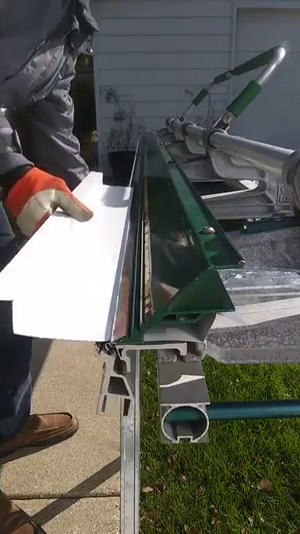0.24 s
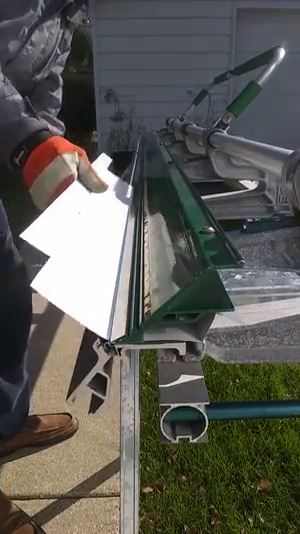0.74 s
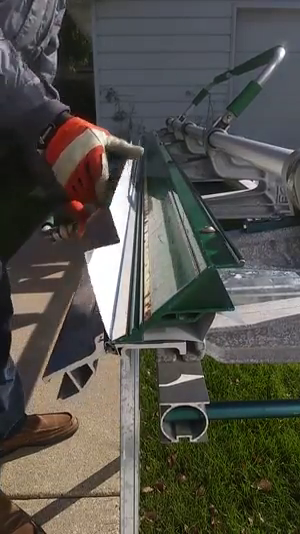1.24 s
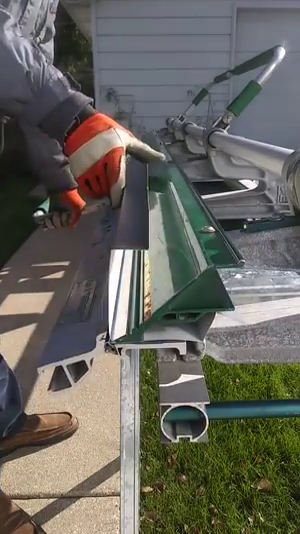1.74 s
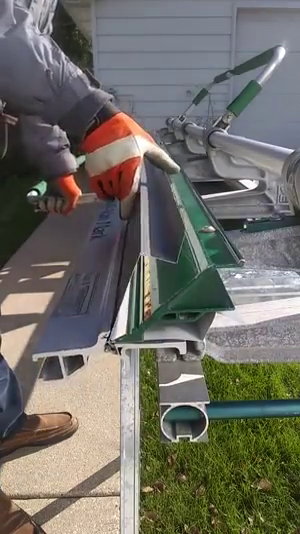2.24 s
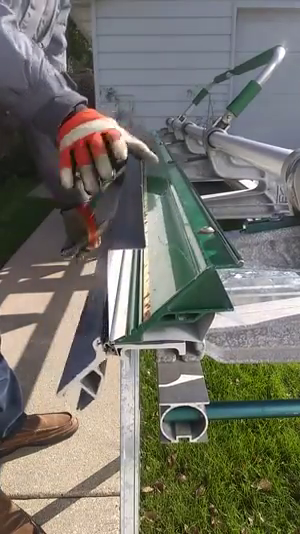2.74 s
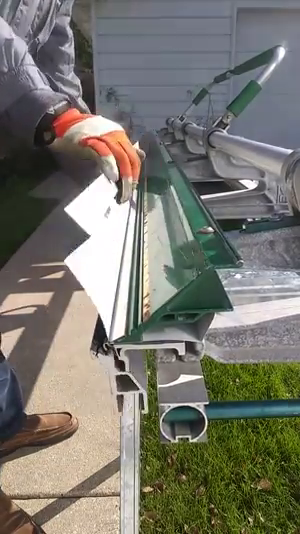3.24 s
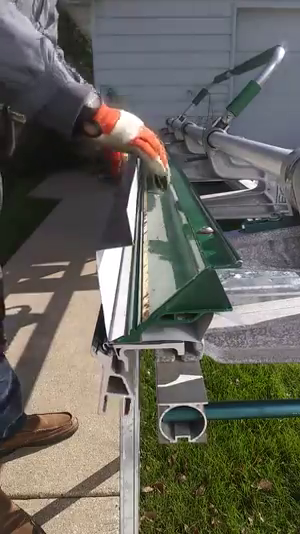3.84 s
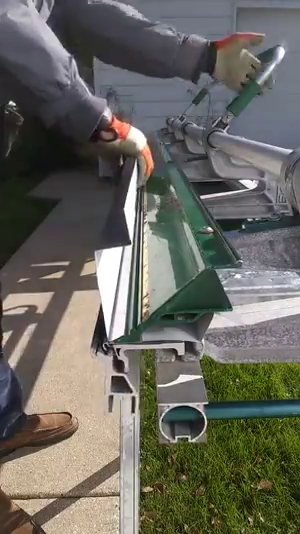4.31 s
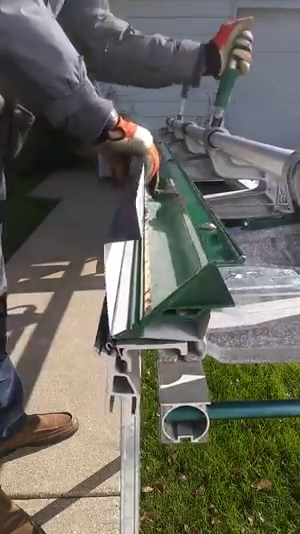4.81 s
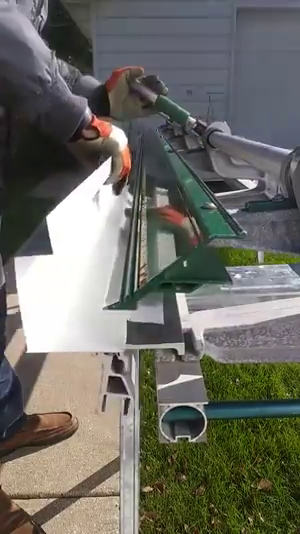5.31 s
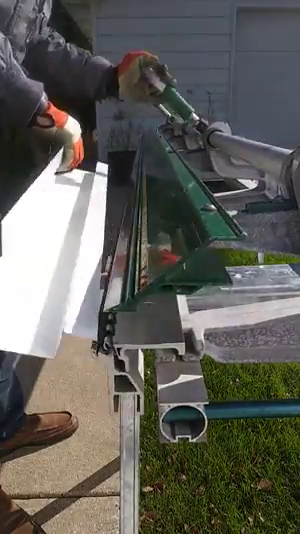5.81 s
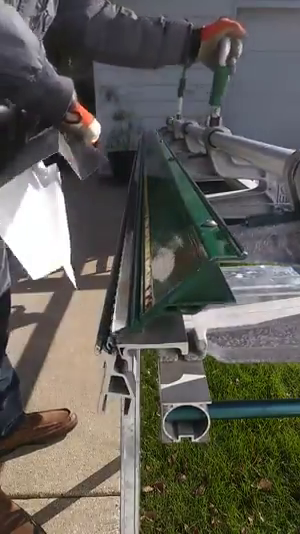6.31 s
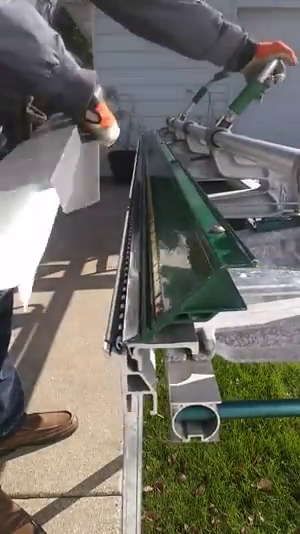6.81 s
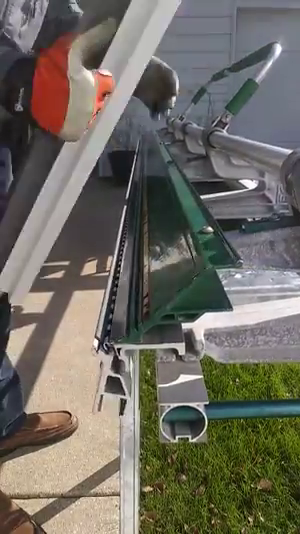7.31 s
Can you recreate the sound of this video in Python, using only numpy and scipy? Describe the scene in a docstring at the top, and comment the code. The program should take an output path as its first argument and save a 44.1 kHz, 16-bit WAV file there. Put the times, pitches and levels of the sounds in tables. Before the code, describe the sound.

Outdoors, a thin aluminum sheet scrapes and flexes in a hand bending brake while the hinge gives high squeals and wind briefly buffets the microphone. The sheet rubs and wobbles in bursts, with a few sharp, hollow knocks. Then the clamp lever judders open in a quick metallic rattle, the sheet snaps free loudly and slides out with light taps, leaving a faint steady hiss.

```python
"""A thin aluminium sheet scrapes, flexes and is knocked flat as it is folded on a hand brake outdoors.
Sliding friction and impacts excite its modes of vibration. The hinge squeals by stick-slip oscillation
as the bending leaf swings up. The clamp lever judders open, and the sheet snaps free and is pulled out.
The yard reverberates faintly behind a steady hiss, and a light wind buffets the microphone."""
import sys
import numpy as np
from scipy import signal
from scipy.fft import rfft, irfft, next_fast_len
from scipy.io import wavfile
from scipy.ndimage import uniform_filter1d, minimum_filter1d, map_coordinates

SR = 44100
rng = np.random.default_rng(int(sys.argv[2]) if len(sys.argv) > 2 else 0)


def store_wav(level_fs):
    """Save 16-bit WAV to argv[1]."""
    pcm = np.round(np.clip(np.atleast_2d(level_fs), -1, 1) * 32767)
    wavfile.write(sys.argv[1], SR, pcm.T.astype(np.int16))


N = 333286

# Levels in the tables are relative; each source applies its own gain.
# Strokes of the sheet on the brake: start_s, rise_s, hold_s, rub_db, flex_db, edge_db
SHEET_STROKES = [ (0.257, 0.019, 0.018, -36.5, -26.5, -67), (0.60, 0.042, .02, -39.5, -44, -53),
                 (0.664, 0.027, .11, -26, -37.5, -23), (0.848, 0.025, 0.01, -29.5, -44, -27.5),
                 (0.898, 0.042, .04, -32, -27.5, -46), (1.043, 0.031, 0.092, -33, -42, -26.5),
                 (1.104, 0.038, .28, -22.5, -28.5, -41), (1.409, .12, 0.078, -27.5, -26.5, -44.5),
                 (1.952, .06, .04, -44, -32.5, -65), (2.05, 0.034, 0.037, -26.5, -29.5, -48),
                 (2.11, 0.034, 0.022, -24.5, -27, -52), (2.17, 0.035, 0.093, -48, -29, -65),
                 (2.675, .034, .064, -16.5, -13.5, -25.5), (2.794, 0.054, 0.046, -27.5, -26.5, -40.5),
                 (2.865, 0.04, 0.011, -23, -28.5, -30.5), (3.05, 0.044, 0.1, -43.5, -36.5, -47),
                 (3.249, 0.025, 0.016, -18.5, -18, -31), (4.529, 0.029, .085, -37, -38, -45),
                 (4.761, 0.035, 0.035, -43.5, -43, -44.5), (4.871, 0.047, .012, -28.5, -27.5, -34.5),
                 (4.948, 0.036, 0.051, -34.5, -32.5, -33.5), (5.264, 0.027, 0.026, -33, -30, -38.5),
                 (5.425, .018, .03, -27, -29, -43), (5.495, 0.029, 0.28, -33, -27.5, -44.5)]
# Decay rates after a stroke: rub_db_per_s, flex_db_per_s, edge_db_per_s
STROKE_RELEASES = [212, 185, 309]
# Hand presses on the panel: start_s, hold_s, level_db
PANEL_PRESSES = [(2.535, 0.085, -30), (2.715, 0.091, -33), (2.88, 0.097, -27), (3.263, .02, -26),
                 (3.33, .01, -27), (3.405, .008, -25), (4.565, 0.046, -30)]
# Impacts: start_s, level_db, brightness_db
SHEET_KNOCKS = [(0.263, -27, -10), (2.353, -25, -1), (2.542, -2, -1.5), (3.279, -17, 0.5), (3.29, -3, -1),
                (4.558, -8.5, -1.5)]
CLAMP_JOLTS = [(3.526, -26, 10), (3.553, -29.5, 7), (4.911, -17.5, 3), (5.047, -11.5, 0), (5.068, -13, 2),
               (5.106, -6, -0.5), (5.130, -11.5, 1), (5.164, -5, -5), (5.177, -11.5, 1), (5.211, -3.5, -4),
               (5.236, -5, -7.5), (5.276, -12.5, -2), (5.290, -8.5, -8)]
SHEET_SNAP = [(5.467, 2, 10)]
CORNER_TAPS = [(5.6685, -28.5, 3), (5.697, -24.5, 9), (5.7358, -14, 4), (6.7403, -33, -17)]
# Stick-slip squeals: start_s, hold_s, pitch_hz, level_db
HINGE_LOW_SQUEALS = [(0.663, 0.096, 1555, -14), (0.780, 0.073, 1564, -10), (0.874, 0.012, 1516, -19.5),
                     (0.926, .008, 1522, -23.5)]
HINGE_HIGH_SQUEALS = [(0.644, .002, 2345, -29), (0.666, 0.027, 2407, -15), (0.721, 0.058, 2436, -16),
                      (0.865, 0.062, 2575, -26)]
LEAF_SQUEAL = [(1.043, 0.07, 1230, -17.5)]
LEAF_CHIRP = [(2.498, .022, 960, -30)]
CLAMP_SQUEAL = [(5.044, 0.032, 940, -21.5)]
# Harmonic series of the squeals: harmonic_number, level_db
HINGE_HARMONICS = [(1, -1), (2, -14), (3, -18.5), (4, -24.5), (5, -38), (6, -52)]
SQUEAK_HARMONICS = [(1, 1), (2, -11.5), (3, -28.5), (4, -40)]
LEAF_HARMONICS = [(1, -1.5), (2, -3), (3, -14.5), (4, -9.5), (5, -33), (6, -35)]
JUDDER_HARMONICS = [(4, -16), (6, -2.5), (7, -12), (9, -7), (11, -8.5), (14, -11), (22, -21)]
CHIRP_HARMONICS = [(1, -0.5), (2, -8.5), (3, -18), (4, -18), (5, -29)]
# Normal modes of the metal: frequency_hz, level_db, t60_s
SHEET_RESONANCES = [(284, -18, 0.42), (383.7, -9.5, 0.12), (548, 0.5, 0.092), (650, -5.5, 0.25),
                    (786, 2, 0.11), (1186, -13, 0.25), (1570, 3, 0.022), (1327, -3.5, 0.11),
                    (1970, -12.5, 0.16), (2560, -6.5, 0.13)]
EDGE_RESONANCES = [(3383, 0.5, 0.22), (5370, -3, 0.14), (7680, -17, 0.18), (10200, -33, .15)]
PANEL_RESONANCES = [(292, -8, 0.2), (379, -4.5, 0.16), (548, 6.5, 0.17), (640, -6.5, 0.12),
                    (798, -9.5, 0.11)]
CLAMP_RESONANCES = [(752, -2.5, 0.076), (960, -21, 0.046), (1499, -2, 0.09), (1593, 5.5, 0.044),
                    (1760, -23, .12), (2270, -11, 0.14), (2360, -3, 0.056), (2750, -7, 0.11),
                    (5660, -13, .12), (5990, -17, 0.11), (6800, -27, .15)]
SNAP_RESONANCES = [(745, -5, .2), (993, -8, .2), (1470, 1, 0.17), (1635, -2, 0.12), (2420, -4, .11),
                   (2714, -0.5, .09), (5570, -12.5, .1), (6650, -16, 0.12)]
CORNER_RESONANCES = [(1580, -2, .08), (2230, 1, .08), (5600, 0, .05), (5790, 0, .05), (6110, -1, .05),
                     (6650, -8, .05)]
# Spectral envelopes of friction, impacts and air: frequency_hz, level_db
RUB_SPECTRUM = [(300, -26.5), (700, -3.5), (1100, 0), (1900, 4), (2700, -4), (3600, -11.5), (4300, -20.5),
                (6000, -20.5), (9000, -65)]
FLEX_SPECTRUM = [(70, -66), (280, -13.5), (390, -1), (620, 0), (850, 0), (1200, -9), (2500, -62)]
EDGE_SPECTRUM = [(2000, -25), (3400, 11), (4400, -2), (5400, 2.5), (6300, 0), (7000, -17), (9000, -20.5),
                 (11500, -33.5), (15500, -30)]
KNOCK_SPECTRUM = [(60, -65), (280, -25), (550, 6.5), (1000, 5.5), (1900, 1.5), (3500, -3), (4300, -14),
                  (6000, -8), (7200, -27), (11000, -45), (15500, -54)]
CLAMP_SPECTRUM = [(50, -41), (250, -2.5), (700, -5), (1200, 0.5), (1650, 8), (2700, 3), (3400, -6),
                  (4800, -9.5), (6300, -8.5), (7500, -21.5), (11000, -34.5), (15500, -49)]
BUFFET_SPECTRUM = [(18, -62), (30, -41.5), (63, -8.5), (146, -3), (215, -1.5), (313, -8.5), (473, -14.5),
                   (600, -25.5), (780, -47), (1320, -120)]
AIR_SPECTRUM = [(22, -43), (49, -13.5), (113, -0.5), (280, -3.5), (370, -6.5), (527, -4), (750, -8.5),
                (1900, -8.5), (3750, -11.5), (4300, -17), (6250, -18), (7300, -35), (11000, -47),
                (15800, -50.5)]
# Decay times of the sheet's dense modes and of the yard: frequency_hz, t60_s
PLATE_DECAY = [(300, 0.24), (1500, 0.14), (6000, 0.094), (14000, 0.018)]
YARD_DECAY = [(200, 0.82), (2000, 0.35), (6000, 0.38), (14000, 0.19)]
# Gusts on the microphone: start_s, hold_s, level_db
WIND_GUSTS = [(0.61, 0.033, -29.5), (0.71, 0.4, -19), (1.03, 0.011, -22), (1.18, .025, -27.5),
              (1.59, 0.09, -35.5), (7.15, 0.11, -36.5)]
# Strength of the breeze: time_s, level_db
BREEZE_LEVELS = [(0, -45), (1.5, -41), (2.1, -50), (4.9, -48), (5.6, -41), (6.12, -38.5), (7.56, -39.5)]

SAG_DB_PER_S = 31  # every push weakens while it lasts
SQUEAL_RELEASE_DB_PER_S = 404
TOP_HZ = 15850


def sheet_scraping(catch_db=2.5, grit_db=3.5):
    """Frictional excitation: each stroke rubs the face, flexes the panel and drags the sharp edge."""
    slips = amp(catch_db * wobble(130) + grit_db * wobble(1500))
    rub_gain, flex_gain, edge_gain = stroke_gains()
    rub = amp(2.5) * rub_gain * friction(slips, RUB_SPECTRUM, plate_db=0.5, modes_db=-11.5)
    flex = amp(-3.5) * flex_gain * friction(slips, FLEX_SPECTRUM, plate_db=2, modes_db=-8.5)
    edge = amp(2) * edge_gain * friction(slips, EDGE_SPECTRUM, plate_db=19, modes_db=-21)
    # dragged under pressure, the edge sings in its own high modes
    singing = amp(17.5) * edge_gain * flex_gain * resonance(slips, EDGE_RESONANCES)
    # pressed by hand, the panel drones in its hollow low modes
    press_gain = swells(PANEL_PRESSES, rise_s=0.014, release_db_per_s=300)
    drone = press_gain * resonance(slips, PANEL_RESONANCES)
    return rub + flex + edge + singing + drone


def stroke_gains():
    """Incoherent addition: overlapping strokes sum in power, for rub, flex and edge in turn."""
    for k, release in enumerate(STROKE_RELEASES):
        strokes = [amp(levels_db[k]) * swell(start_s, rise_s, hold_s, release)
                   for start_s, rise_s, hold_s, *levels_db in SHEET_STROKES]
        yield np.linalg.norm(strokes, axis=0)


def friction(slips, spectrum, plate_db, modes_db):
    """Source and filter: tiny slips are heard directly and through the ringing sheet; rms 1."""
    grains = slips * rng.standard_normal(N)
    body = amp(plate_db) * diffuse_tail(PLATE_DECAY) + amp(modes_db) * modal_ring(SHEET_RESONANCES)
    ringing = signal.fftconvolve(grains, body)[:N]
    return unit_rms(coloured(grains + ringing, spectrum))


def resonance(slips, modes):
    """Forced vibration: random slips keep a few modes ringing; rms 1."""
    grains = slips * rng.standard_normal(N)
    return unit_rms(signal.fftconvolve(grains, modal_ring(modes))[:N])


def clatter():
    """Impact excitation: the sheet knocks, the clamp jolts, the sheet snaps free and a corner taps."""
    knocks = impacts(SHEET_KNOCKS, KNOCK_SPECTRUM, SHEET_RESONANCES, gain_db=-11, modes_db=-4.5,
                     chatter_t60_s=0.092)
    jolts = impacts(CLAMP_JOLTS, CLAMP_SPECTRUM, CLAMP_RESONANCES, gain_db=-6, modes_db=0.5,
                    chatter_t60_s=0.061)
    snap = impacts(SHEET_SNAP, CLAMP_SPECTRUM, SNAP_RESONANCES, gain_db=-7.5, modes_db=-2.5,
                   chatter_t60_s=0.095)
    taps = impacts(CORNER_TAPS, CLAMP_SPECTRUM, CORNER_RESONANCES, gain_db=-6.5, modes_db=-1,
                   chatter_t60_s=0.12)
    return knocks + jolts + snap + taps


def impacts(events, spectrum, modes, gain_db, modes_db, chatter_t60_s,
            plate_db=-3, rise_s=0.00083, hold_s=0.0069):
    """Free vibration: metal meets metal in a brief chatter, then rings on in its damped modes."""
    out, t = np.zeros(N + SR), np.arange(SR // 2) / SR
    attack = 1 - np.exp(-t / rise_s)
    chatter_gain = amp(-60 * np.maximum(t - hold_s, 0) / chatter_t60_s)
    for start_s, level_db, brightness_db in events:
        chatter = unit_energy(rng.standard_normal(len(t)) * chatter_gain)
        plate = amp(plate_db) * diffuse_tail(PLATE_DECAY)
        burst = unit_energy(coloured((chatter + plate) * attack, spectrum))
        hit = burst + amp(modes_db) * modal_ring(modes) * attack
        hit = coloured(hit, [(1700, 0), (3000, brightness_db / 2), (8000, brightness_db)])
        attack_rms = np.std(hit[:SR // 100])
        out[round(start_s * SR):][:len(t)] += amp(level_db + gain_db) * hit / attack_rms
    return out[:N]


def brake_squeals():
    """Stick-slip friction: hinge and leaf squeal on the swing; the leaf's return and the clamp chirp."""
    low = squeal(HINGE_LOW_SQUEALS, HINGE_HARMONICS, gain_db=0.5, jitter=0.0041, rise_s=0.018,
                 glide_hz_per_s=-65.5, rasp_rad=0.12)
    high = squeal(HINGE_HIGH_SQUEALS, SQUEAK_HARMONICS, gain_db=-1, jitter=0.0053, rise_s=0.019,
                  glide_hz_per_s=300, rasp_rad=0.13)
    leaf = squeal(LEAF_SQUEAL, LEAF_HARMONICS, gain_db=1, jitter=0.005, rise_s=0.053, rasp_rad=0.068)
    # every fifth slip is stronger, which adds lines between the overtones
    judder = squeal(LEAF_SQUEAL, JUDDER_HARMONICS, gain_db=-4, jitter=0.0028, rise_s=0.06,
                    rasp_rad=0.02, softening=0, slips_per_cycle=5)
    chirp = squeal(LEAF_CHIRP, CHIRP_HARMONICS, gain_db=3, jitter=0.0097, rise_s=0.0072,
                   glide_hz_per_s=690)
    clamp = squeal(CLAMP_SQUEAL, SQUEAK_HARMONICS, gain_db=0.5, jitter=0.049, rise_s=0.0068)
    return low + high + leaf + judder + chirp + clamp


def squeal(events, harmonics, gain_db, jitter, rise_s, glide_hz_per_s=0, rasp_rad=0.079,
           softening=0.27, flutter_db=2.5, slips_per_cycle=1):
    """Relaxation oscillation: metal sticks and slips almost periodically, giving a harmonic series."""
    t = np.arange(N) / SR
    gains = [amp(level_db) * swell(start_s, rise_s, hold_s, SQUEAL_RELEASE_DB_PER_S)
             for start_s, hold_s, _, level_db in events]
    pitches_hz = [pitch_hz + glide_hz_per_s * (t - start_s) for start_s, _, pitch_hz, _ in events]
    envelope = sum(gains) + 1e-12
    slip_hz = sum(gain * hz for gain, hz in zip(gains, pitches_hz)) / envelope
    cycle_hz = slip_hz / slips_per_cycle * (1 + jitter * wobble(300))
    phase = 2 * np.pi * np.cumsum(cycle_hz) / SR
    phase += rasp_rad * wobble(900)  # each slip comes a little early or late
    tilt_db = softening * 20 * np.log10(envelope / envelope.max())  # a weak squeal loses overtones first
    tone = sum(amp(level_db + k * tilt_db + flutter_db * wobble(70)) * np.sin(round(k) * phase)
               for k, level_db in harmonics)
    return np.sqrt(2) * tone * envelope * amp(gain_db)


def yard_reverberation(sound):
    """Reflection: the house wall and yard return a faint, diffuse decay after a short delay."""
    response = np.pad(diffuse_tail(YARD_DECAY), (SR // 80, 0))
    return amp(-11.5) * signal.fftconvolve(sound, response)[:N]


def wind(flutter_db=1.5):
    """Turbulence: pressure fluctuations buffet the microphone in lumps."""
    breeze_db = np.interp(np.arange(N) / SR, *np.transpose(BREEZE_LEVELS))
    gust_gain = swells(WIND_GUSTS, rise_s=0.058, release_db_per_s=251)
    wind_db = 20 * np.log10(np.hypot(amp(breeze_db), gust_gain))
    buffet = unit_rms(coloured(rng.standard_normal(N), BUFFET_SPECTRUM) * amp(flutter_db * wobble(30)))
    # a light breeze stirs only the lowest rumble; stronger gusts reach higher
    strength = np.clip((wind_db + 34.5) / 12, 0, 1)
    rumble = unit_rms(coloured(buffet, [(60, 3), (130, -2), (250, -9.5), (600, -12.5)]))
    return amp(wind_db - 0.5) * (strength * buffet + (1 - strength) * rumble)


def air_hiss():
    """Stationary broadband noise: the steady hiss of the open air."""
    return amp(-40) * unit_rms(coloured(rng.standard_normal(N), AIR_SPECTRUM))


def modal_ring(modes):
    """Modal superposition: damped sinusoids, at slightly new strengths each time; energy 1."""
    t = np.arange(SR // 2) / SR
    partials = [amp(level_db + rng.normal() - 60 * t / t60_s) / np.sqrt(t60_s)
                * np.sin(2 * np.pi * hz * t) for hz, level_db, t60_s in modes]
    return unit_energy(sum(partials))


def diffuse_tail(decay):
    """Modal overlap: dense modes merge into noise, each frequency dying at its own rate; energy 1."""
    hz, t, noise = signal.stft(rng.standard_normal(SR // 2), SR, nperseg=128)
    damping = amp(-60 * t / log_interp(decay, hz)[:, None])
    _, tail = signal.istft(noise * damping, SR, nperseg=128)
    return unit_energy(tail[:SR // 2])


def swell(start_s, rise_s, hold_s, release_db_per_s):
    """Amplitude envelope of one push: a smooth rise, a sagging hold, an exponential release."""
    out, t = np.zeros(N + SR), np.arange(SR) / SR
    attack = np.sin(np.pi / 2 * np.minimum(t / rise_s, 1)) ** 2
    sag_db = SAG_DB_PER_S * np.maximum(t - rise_s, 0)
    release_db = release_db_per_s * np.maximum(t - rise_s - hold_s, 0)
    out[round(start_s * SR):][:SR] = attack * amp(-sag_db - release_db)
    return out[:N]


def swells(events, rise_s, release_db_per_s):
    """Power summation: the joint gain of pushes that share a rise and a release."""
    pushes = [amp(level_db) * swell(start_s, rise_s, hold_s, release_db_per_s)
              for start_s, hold_s, level_db in events]
    return np.linalg.norm(pushes, axis=0)


def wobble(rate_hz):
    """Random modulation: a smooth curve through rate_hz random values a second."""
    knots = rng.standard_normal(int(N * rate_hz / SR) + 4)
    return map_coordinates(knots, [np.arange(N) * rate_hz / SR])


def coloured(x, spectrum, size=8192):
    """Minimum-phase filtering: folding the cepstrum gives a causal filter with this spectrum."""
    magnitude = amp(log_interp(spectrum, np.fft.rfftfreq(size, 1 / SR)))
    cepstrum = irfft(np.log(magnitude))
    cepstrum[1:size // 2] *= 2
    cepstrum[size // 2 + 1:] = 0
    response = irfft(np.exp(rfft(cepstrum)))
    return signal.fftconvolve(x, response)[:len(x)]


def log_interp(points, hz):
    """Interpolation on a logarithmic frequency axis."""
    points_hz, values = np.transpose(points)
    return np.interp(np.log(hz + 1), np.log(points_hz + 1), values)


def amp(db):
    """Decibels to amplitude ratio."""
    return 10 ** (np.asarray(db) / 20)


def unit_rms(x):
    """Normalisation to rms 1."""
    return x / np.sqrt(np.mean(x ** 2) + 1e-20)


def unit_energy(x):
    """Normalisation to energy 1."""
    return x / np.linalg.norm(x)


def scene():
    """Superposition: the direct sound of the metal, its reverberation and the open air, in mono."""
    metal = brake_squeals() + sheet_scraping() + clatter()
    return (metal + yard_reverberation(metal) + air_hiss() + wind())[None]


def record(dry):
    """Peak and band limiting: a fast gain dip holds down the peaks; nothing above TOP_HZ is kept."""
    ceiling, window = 0.92, SR // 400
    needed_gain = ceiling / np.maximum(np.abs(dry[0]), ceiling)
    gain = uniform_filter1d(minimum_filter1d(needed_gain, window), window)
    size = next_fast_len(N + 8192)
    passband = np.fft.rfftfreq(size, 1 / SR) < TOP_HZ
    return irfft(rfft(dry[0] * gain, size) * passband, size)[None, :N]


dry = scene()
out = record(dry)
store_wav(out)
```